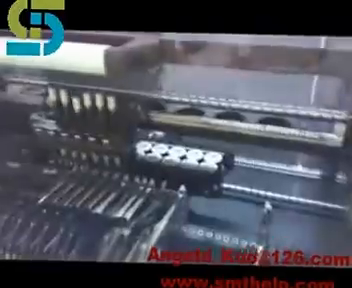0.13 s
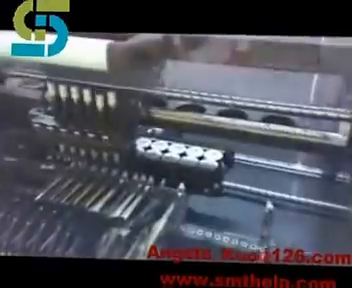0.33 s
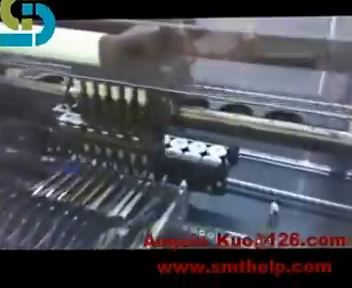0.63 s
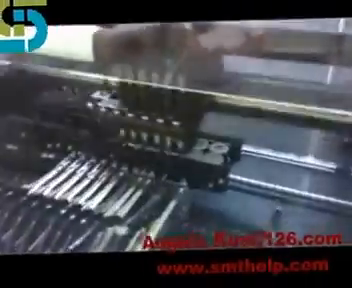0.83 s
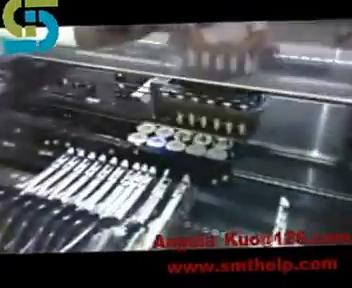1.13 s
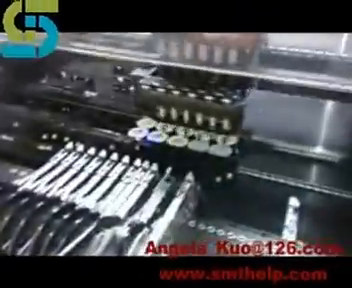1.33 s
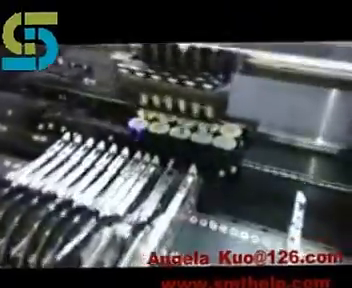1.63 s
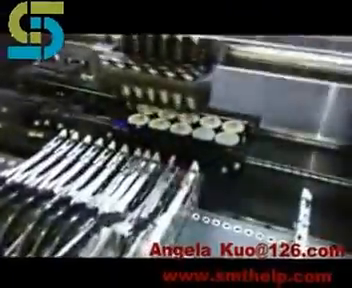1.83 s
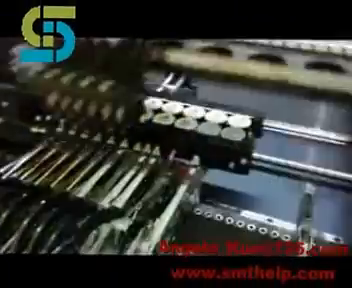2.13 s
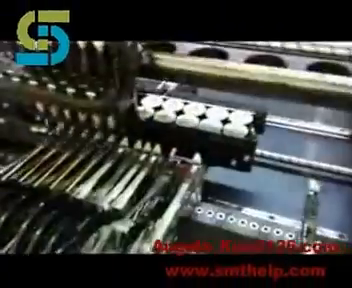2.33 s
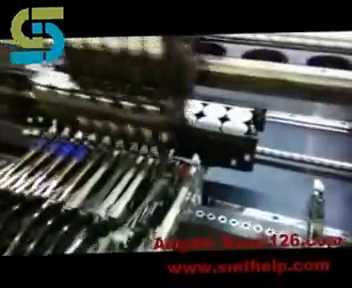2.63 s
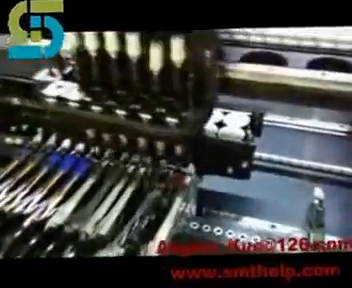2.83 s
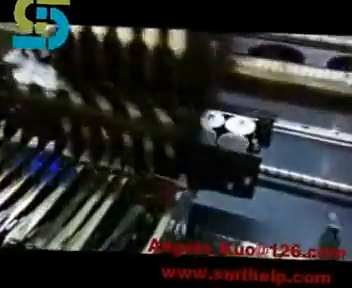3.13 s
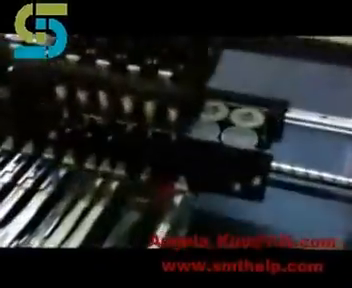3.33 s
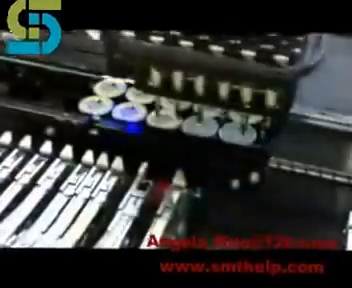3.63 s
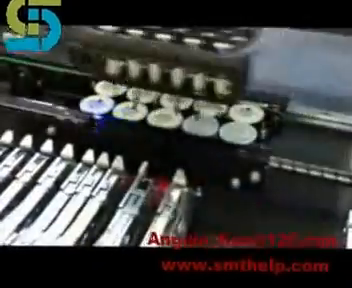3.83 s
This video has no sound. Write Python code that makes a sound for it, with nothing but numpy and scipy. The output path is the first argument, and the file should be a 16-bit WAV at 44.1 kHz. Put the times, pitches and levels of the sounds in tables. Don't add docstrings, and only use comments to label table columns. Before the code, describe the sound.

Close to an automated placement machine, sparse air puffs give way to denser clacks, ticks and rising vacuum hiss, over bed rumble and broad hall noise; the treble is patchy, like a cheap compressed microphone.

```python
import sys
import numpy as np
from scipy import signal
from scipy.fft import rfft, irfft
from scipy.io import wavfile
from scipy.ndimage import uniform_filter1d

SR = 44100
rng = np.random.default_rng(int(sys.argv[2]) if len(sys.argv) > 2 else 0)


def transcribe(signal):
    frames = np.atleast_2d(signal).T
    limited = np.clip(frames, -1, 1)
    pcm = np.round(limited * 32767).astype(np.int16)
    wavfile.write(sys.argv[1], SR, pcm)


def level_to_linear(level):
    exponent = np.asarray(level, float) / 20
    return 10 ** exponent


N = 176400
TIME_S = np.arange(N) / SR


def unit(x):
    return x / np.sqrt(np.mean(x ** 2) + 1e-18)


def shaped(gain):
    spectrum = rfft(rng.standard_normal(N)) * gain(np.fft.rfftfreq(N, 1 / SR) + 1)
    return unit(irfft(spectrum, N))


def ringing(hz, width_hz):
    return shaped(lambda f: 1 / (1 + ((f - hz * hz / f) / width_hz) ** 2))


def walk(rate_hz):
    hold = int(SR / rate_hz)
    steps = np.repeat(rng.standard_normal(N // hold + 1), hold)
    return unit(uniform_filter1d(uniform_filter1d(steps, hold), hold)[:N])


def wavering(hz, width_hz):
    phase = 2 * np.pi * np.cumsum(hz + width_hz * walk(9)) / SR
    return unit(np.sin(phase) * level_to_linear(1.67 * walk(8)))


def curve(rows, axis=1):
    points = np.array(rows)
    return np.interp(TIME_S, points[:, 0], points[:, axis])


def burst(start_s, length_s, rise_s, swell):
    t = TIME_S - start_s
    rise = np.clip(t / (rise_s + swell * length_s) + 1, 0, 1) ** 2
    return rise * np.exp(-np.clip(t - length_s / 2, 0, None) / (length_s / 2))


def panned(mid, side, left_db):
    return np.array([level_to_linear(left_db / 2) * (mid + side), level_to_linear(-left_db / 2) * (mid - side)])


def pair(make, left_db, alike):
    alike = np.clip(alike, 0, 1)
    mid = np.sqrt(1 + alike) * make()
    side = np.sqrt(1 - alike) * make()
    return panned(mid, side, left_db) / np.sqrt(2)


def hall():
    # hz, density_db
    centre_rows = [(15, -30), (25, 2), (239, -4), (375, -7.5), (546, -12), (3320, -17), (8600, -15),
                   (10000, -27.5), (13000, -56.5), (22000, -120)]
    # hz, density_db
    width_rows = [(53, -34), (90, -3.5), (344, -4), (387, -10), (541, -7.5), (2720, -7), (8710, -8.5),
                  (10000, -19), (13000, -45), (22000, -120)]
    # time_s, level_db
    bustle = [(.13, -2.5), (.5, -2.5), (.9, -2), (1.3, -2.5), (1.7, -1.6), (2.05, -3.5), (2.45, 0.6),
              (2.85, -0.2), (3.1, 0), (3.5, -0.2), (3.75, 0.5), (4, -0.8)]

    def coloured(rows):
        hz, density_db = np.array(rows).T
        return shaped(lambda f: level_to_linear(np.interp(np.log(f), np.log(hz), density_db)))

    mid = level_to_linear(-32) * coloured(centre_rows)
    side = level_to_linear(-35) * coloured(width_rows)
    return panned(mid, side, left_db=4) * level_to_linear(curve(bustle))


def motors():
    # pitch_hz, width_hz, level_db (rms)
    hum_lines = [(69.95, 2.92, -41.5), (51.2, 5.48, -39), (240, 7, -49), (136.2, 5.53, -56.5),
                 (482, 7.86, -55)]
    # time_s, level_db
    load = [(0.14, -47), (0.15, -41.5), (1.7, -38.5), (1.75, -45), (2.06, -36), (3.02, -40.5),
            (3.14, -31.5), (3.18, -39), (3.65, -38), (3.89, -29), (4.0, -38.5)]
    # time_s, pitch_hz, level_db
    servo_run = [
        (3.03, 246, -56),
        (3.065, 243.7, -33.5),
        (3.17, 240, -35.5),
        (3.26, 211.4, -38),
        (3.32, 206, -70),
    ]

    def hum(low):
        lines = [row for row in hum_lines if (row[0] < 100) == low]
        return sum(level_to_linear(db) * (wavering(hz, w) + 0.6 * ringing(hz, 2 * w)) for hz, w, db in lines)

    rumble = pair(lambda: unit(hum(True)), 2.2, 0.91) * level_to_linear(curve(load) + 0.5)
    high_hum = pair(lambda: hum(False), 5.4, 1.0)
    fan = wavering(296, 2.43) * level_to_linear(-45 - 1.5 * TIME_S)
    servo_phase = 2 * np.pi * np.cumsum(curve(servo_run)) / SR
    servo = np.sqrt(2) * np.sin(servo_phase) * level_to_linear(curve(servo_run, axis=2))
    return rumble + high_hum + (servo + fan) * level_to_linear(np.array([[2.0], [-2.0]]))


def valves():
    # start_s, level_db, length_s, brightness_oct (from the valve's middle)
    puff_rows = [(0.123, -27.5, 0.058, -0.42), (0.168, -26.5, 0.027, -0.57), (0.276, -17, 0.017, -0.25),
                 (0.382, -20, 0.013, -0.21), (0.492, -18, 0.025, -0.38), (0.601, -25, 0.012, 0.07),
                 (0.808, -22.5, 0.029, -0.84), (0.842, -20.5, 0.025, -0.31), (1.09, -22.5, 0.041, -0.28),
                 (1.157, -25.5, 0.033, -.6), (1.23, -27, 0.018, -1.1), (1.529, -26, 0.015, -0.31),
                 (1.678, -20.5, 0.043, 0.88), (2.035, -20.5, 0.054, -0.25), (2.17, -10, 0.042, -0.11),
                 (2.248, -18, 0.098, 0.17), (2.293, -19.5, 0.052, -0.43), (2.596, -20, 0.038, 0.077),
                 (2.7, -18.5, 0.061, 0.21), (2.96, -14.5, 0.0078, 0.31), (3.15, -16, 0.028, -0.24),
                 (3.256, -19.5, 0.047, -0.042), (3.309, -15, 0.039, 0.4), (3.59, -22.5, 0.059, 0.038),
                 (3.807, -37, 0.035, -0.024)]
    # centre_hz, width_hz, level_db
    body = [(2510, 1300, 0), (3790, 630, -7), (4300, 1200, -4.5), (5030, 1300, -5), (5910, 920, -6.5),
            (7090, 1760, 0.5), (8280, 940, -1.5), (9160, 630, -7)]
    rise_s, swell, min_length_s = 0.0086, 0.06, 0.004
    middle_hz, colour_width_oct = 6070, 0.97
    trim_db, grit_db, left_db = -12, 1, 2

    shapes = [level_to_linear(db) * burst(at, max(length, min_length_s), rise_s, swell)
              for at, db, length, _ in puff_rows]
    out = np.zeros((2, N))
    for hz, width, db in body:
        jet = level_to_linear(db) * pair(lambda: ringing(hz, width), left_db, 0.27)
        octave = np.log2(hz / middle_hz)
        drive = sum(np.exp(-((octave - row[3]) / colour_width_oct) ** 2) * shape
                    for row, shape in zip(puff_rows, shapes))
        out += drive * jet
    return out * level_to_linear(trim_db + grit_db * walk(500))


def vacuum():
    # time_s, level_db
    flow = [(0.2, -105), (0.3, -45), (0.43, -42.5), (0.96, -38), (1.49, -40), (1.88, -32.5), (2.37, -49.5),
            (2.57, -34), (2.73, -34), (3.27, -29.5), (4.0, -31.5)]
    hiss = pair(lambda: ringing(8745, 1920), left_db=10, alike=0.086)
    return hiss * level_to_linear(curve(flow) + 0.5 * walk(24.65) + 0.5 * walk(300))


def ticks():
    # start_s, level_db, pitch_hz
    contacts = [(0.282, -25, 7000), (.386, -38, 4750), (.498, -32, 4100), (0.606, -19, 5040),
                (0.812, -20, 3860), (0.849, -18, 3600), (.879, -20, 2500), (.965, -14.5, 1770),
                (.975, -16, 776), (2.172, -14, 4920), (2.176, -30, 7500), (2.186, -14, 7300),
                (2.196, -9, 7940), (2.304, -22.5, 1760), (2.307, -13, 4500), (2.322, -14.5, 4500),
                (2.713, -13, 5540), (2.963, -17, 5930), (3.155, -11, 5800), (3.313, -17, 4050),
                (3.386, -10, 2000), (3.395, -11, 2200)]
    mode_ratios, decay_cycles, trim_db, left_db = (1, 1.2, 0.73), 7.2, -7, 3.5
    out = np.zeros(N)
    t = np.arange(SR // 20) / SR
    for at, db, hz in contacts:
        modes = sum(np.sin(2 * np.pi * (hz * ratio * t + rng.random())) for ratio in mode_ratios)
        envelope = np.exp(-t * hz / decay_cycles) * (1 - np.exp(-t * hz))
        i = int(at * SR)
        out[i:i + len(t)] += level_to_linear(db + trim_db) * modes / 2 * envelope
    return out * level_to_linear(np.array([[left_db], [-left_db]]) / 2)


def whirs():
    # start_s, pitch_hz, level_db (rms), length_s
    whir_rows = [(0.605, 4970, -37.5, 0.0088), (0.635, 296, -41, 0.054), (0.943, 487, -40.5, 0.073),
                 (1.133, 482, -43, 0.058), (1.907, 499, -41, 0.057), (2.085, 500, -41, 0.061),
                 (2.105, 450, -37, .05), (2.28, 496, -38.5, 0.048), (2.322, 245.2, -42, 0.12),
                 (2.77, 478, -38.5, 0.058), (3.596, 240, -37, 0.14), (3.882, 295, -38, 0.064),
                 (3.867, 178, -37.5, .08)]
    tones = sum(level_to_linear(db) * burst(at, length, 0.002, 0.23) * np.sin(2 * np.pi * hz * TIME_S)
                for at, hz, db, length in whir_rows)
    return np.sqrt(2) * tones * level_to_linear(np.array([[1.8], [-1.8]]))


def slides():
    # start_s, level_db, length_s, frame_ring_db, brightness_db_per_oct
    stops = [(0.606, -27, 0.044, -15, -0.7), (.851, -22.5, 0.056, -19, 1), (0.951, -25, 0.044, -0.5, 1),
             (1.126, -28, 0.052, -3, 3.5), (1.186, -29.5, 0.11, -4, -2.3), (1.224, -32, 0.027, -15, 8),
             (1.368, -28.5, 0.076, -10, -1.7), (1.536, -26.5, 0.043, -7.5, 1.5), (1.873, -31, .03, -5.5, 2),
             (2.04, -22.5, 0.028, -11.5, 4.5), (2.1, -27.5, 0.048, 2, -4.5), (2.206, -25.5, 0.053, -8.5, 2),
             (2.266, -25.5, 0.042, 2, -1.8), (2.303, -17.5, 0.023, -8.5, -1), (2.455, -37, 0.037, 5, 1.5),
             (2.705, -29.5, 0.075, -15, -1.5), (2.77, -35.5, 0.16, -4, -3), (3.07, -33.5, 0.13, -0.5, 0.5),
             (3.265, -22.5, 0.11, -12.5, 5.5), (3.378, -18, 0.025, -11, -2.5), (3.403, -21, 0.026, -8, 3.5),
             (3.589, -23, 0.035, -3.5, 6), (3.633, -26, 0.087, -5.5, -2.3), (3.833, -27, 0.032, -12, 1.5)]
    # centre_hz, width_hz, level_db
    slide_modes = [(690, 980, -2), (1740, 1230, -0.5), (2740, 2700, -2.5), (4500, 4300, -3.5)]
    # centre_hz, width_hz, level_db
    frame_modes = [(494.4, 64, -0.5), (251, 110, -4.5), (703, 170, -4.5)]
    rise_s, swell, min_length_s, middle_hz = 0.0052, 0.41, 0.008, 2000
    trim_db, grit_db, left_db = -10, 3, 3.5

    shapes = [level_to_linear(row[1]) * burst(row[0], max(row[2], min_length_s), rise_s, swell) for row in stops]
    scrape = np.zeros((2, N))
    for hz, width, db in slide_modes:
        rub = level_to_linear(db - 4) * pair(lambda: ringing(hz, width), left_db, 0.3)
        octave = np.log2(hz / middle_hz)
        scrape += sum(level_to_linear(row[4] * octave) * shape for row, shape in zip(stops, shapes)) * rub
    frame = pair(lambda: unit(sum(level_to_linear(db) * ringing(hz, w) for hz, w, db in frame_modes)), left_db, 0.81)
    frame_drive = sum(level_to_linear(row[3]) * shape for row, shape in zip(stops, shapes))
    return level_to_linear(trim_db) * (scrape * level_to_linear(grit_db * walk(400)) + frame_drive * frame)


def scene():
    t60_s, puff_room_db, clack_room_db = 0.4, -7, 1
    puffs, clacks = valves() + ticks(), slides()
    t = np.arange(SR // 2) / SR
    tail = rng.standard_normal((2, len(t))) * np.exp(-np.log(1000) * t / t60_s)
    tail = tail / np.sqrt(np.sum(tail ** 2, axis=1, keepdims=True))
    send = level_to_linear(puff_room_db) * puffs + level_to_linear(clack_room_db) * clacks
    wet = signal.fftconvolve(send, tail, axes=1)[:, :N]
    return puffs + clacks + wet + hall() + vacuum() + motors() + whirs()


def patches_db(f, t, treble):
    # centre_hz, width_hz, depth_db
    notch_rows = [(7280, 63, -9), (7530, 110, -26), (6940, 69, -23), (6170, 100, -19), (5830, 83, -19),
                  (5360, 90, -8), (4710, 70, -6), (2870, 110, -12)]
    patch_db, hole_db, hole_share, blotch_db = 2, -19.5, 0.11, 1.18
    band, frame = np.arange(len(f)) // 3, np.arange(len(t)) // 4
    chance = rng.random((2, 2, band[-1] + 1, frame[-1] + 1))
    rarity = uniform_filter1d(chance[1], size=2, axis=2) ** 2 * 2 / hole_share
    holes = np.clip((1 - rarity) * 3, 0, 1) * hole_db
    cells = patch_db * np.sqrt(12) * (chance[0] - 0.5) + holes
    db = cells[:, band][:, :, frame] * treble
    for hz, width, depth in notch_rows:
        sway = walk(8.8)[::512][np.arange(len(t)) % (N // 512)]
        db = db + depth * np.outer(np.exp(-((f - hz) / width) ** 2), np.clip(sway - 0.3, 0, 1.5))
    blotch = rng.standard_normal((len(f), len(t)))
    for axis, size in ((0, 14), (0, 14), (1, 7), (1, 7)):
        blotch = uniform_filter1d(blotch, size=size, axis=axis)
    return db + blotch_db * unit(blotch) * (f > 400)[:, None]


def folds_db(f, t):
    # start_s, length_s, above_hz, depth_db
    fold_rows = [(1.1, .03, 4000, -15), (1.505, 0.037, 4000, -18), (1.923, 0.038, 4000, -15),
                 (2.04, 0.062, 3880, -50), (2.271, 0.098, 3980, -20), (2.629, 0.028, 4500, -22),
                 (2.712, 0.036, 1500, -23), (2.851, 0.036, 1490, -52), (3.237, 0.058, 1480, -66),
                 (3.59, 0.041, 2500, -25), (3.828, 0.049, 1990, -12)]
    db = np.zeros((len(f), len(t)))
    for at, length, hz, depth in fold_rows:
        window = np.clip((length / 2 - abs(t - at - length / 2)) / 0.0065 + 0.5, 0, 1)
        db += depth * np.outer((f > hz) & (f < 9000), window)
    return db


def masking_db(f, mid_power):
    def power(low_hz, high_hz):
        return mid_power[(f > low_hz) & (f < high_hz)]

    bright_db = 10 * np.log10(np.sum(power(4000, 7500), axis=0) / np.sum(power(500, 2200), axis=0))
    duck = 0.34 * np.outer((f > 500) & (f < 2200), np.clip(bright_db - 16, 0, 12))
    hiss_db = 10 * np.log10(np.mean(power(8000, 9500), axis=0) / np.mean(power(2500, 5000), axis=0))
    hiss_db = uniform_filter1d(hiss_db, size=5)
    hollow = 0.36 * np.outer(np.exp(-((f - 3600) / 1020) ** 2), np.clip(hiss_db - 2.5, 0, 12))
    return -duck - hollow


def top_cut(x):
    return signal.sosfilt(signal.butter(12, 10450, fs=SR, output="sos"), x)


def record(dry):
    limit, sparse, low_cut_hz, start_s = 0.55, 0.45, 42, 0.1295
    edge_hz, edge_wobble_hz = 10140, 125
    limited = limit * np.tanh(dry / limit)
    f, t, z = signal.stft(np.array([[1, 1], [1, -1]]) @ limited / 2, SR, nperseg=1024)
    size = abs(z) + 1e-12
    treble = np.clip(f / 5000, 0.15, 1)[:, None]

    db = patches_db(f, t, treble) + masking_db(f, size[0] ** 2)
    db[1] += folds_db(f, t)
    edge = edge_hz + edge_wobble_hz * rng.standard_normal(len(t) // 8 + 1)[np.arange(len(t)) // 8]
    db = db - np.clip((f[:, None] - edge) / 6, 0, 80)

    z = z * (size / uniform_filter1d(size, size=9, axis=1)) ** (sparse * treble)
    mid, side = signal.istft(z * level_to_linear(db), SR, nperseg=1024)[1][:, :N]
    low_cut = signal.butter(3, low_cut_hz, "high", fs=SR, output="sos")
    x = signal.sosfilt(low_cut, np.array([mid + side, mid - side]))
    return top_cut(x * np.clip((TIME_S - start_s) / 0.004, 0, 1))


dry = scene()
out = record(dry)
transcribe(out)
```